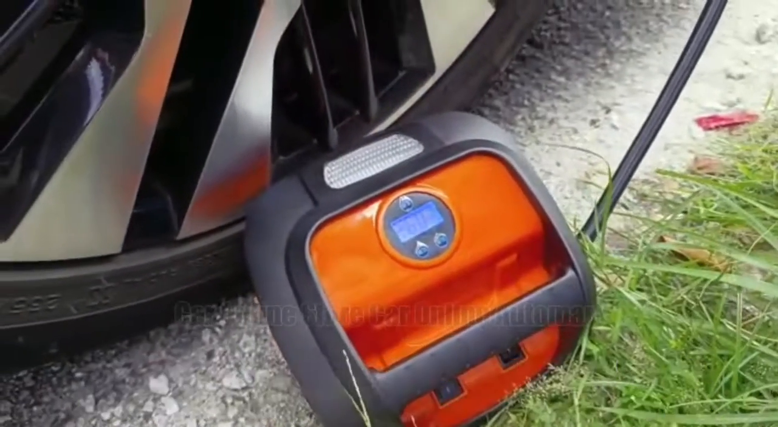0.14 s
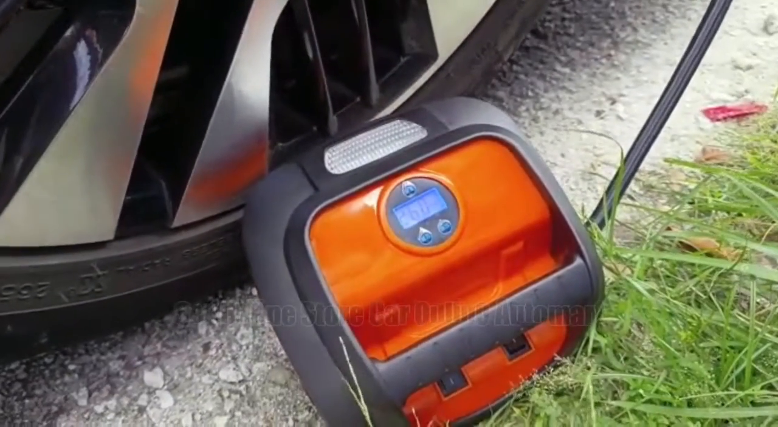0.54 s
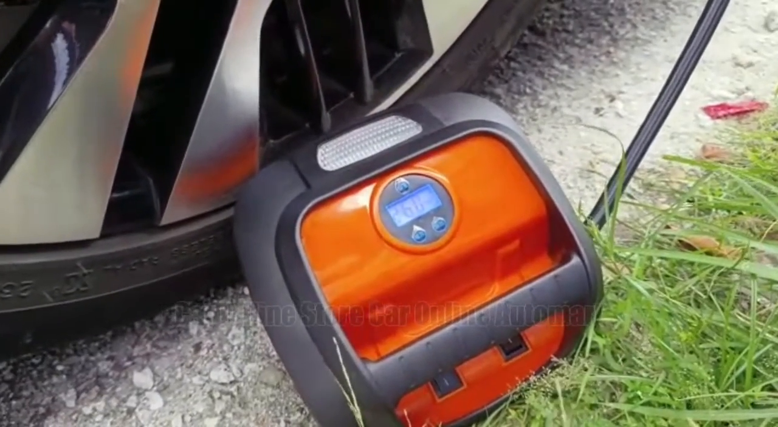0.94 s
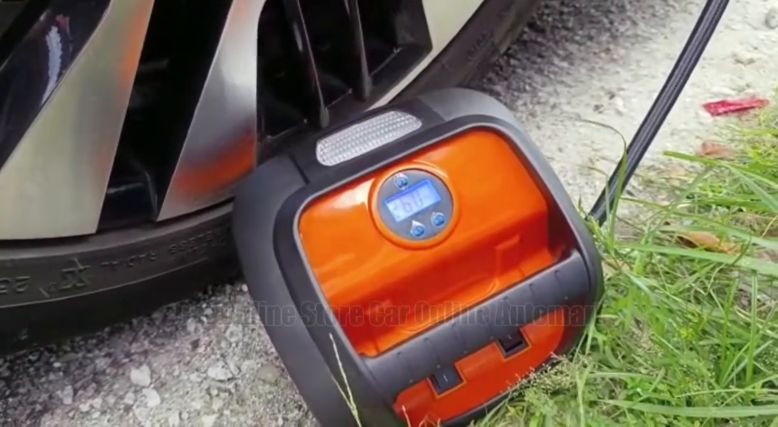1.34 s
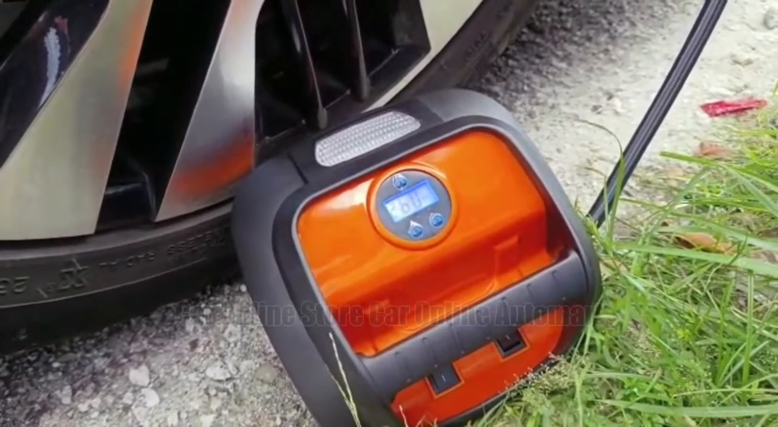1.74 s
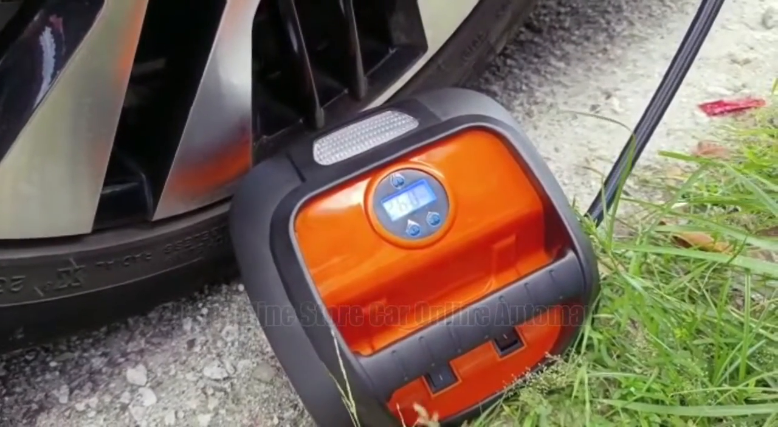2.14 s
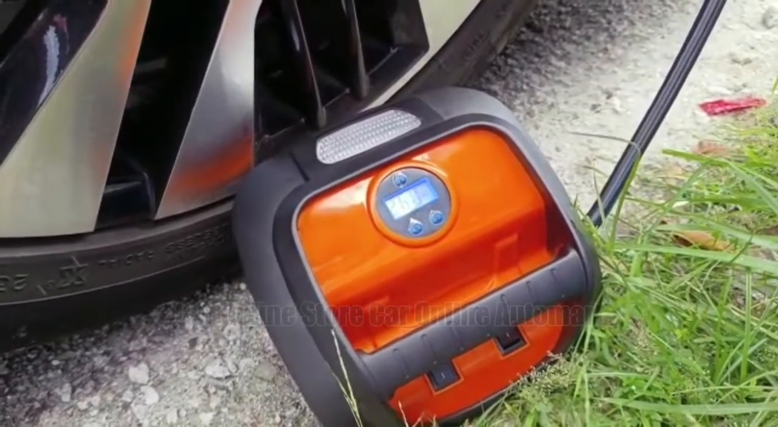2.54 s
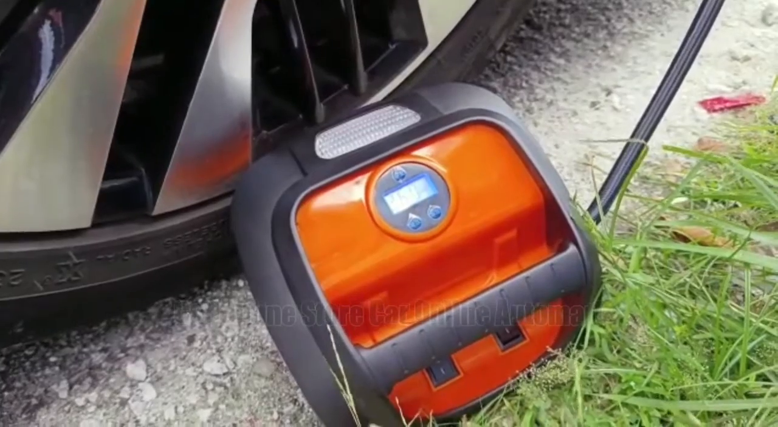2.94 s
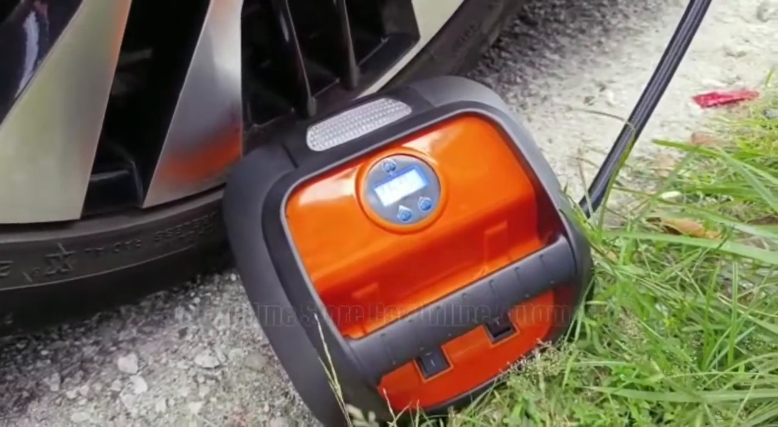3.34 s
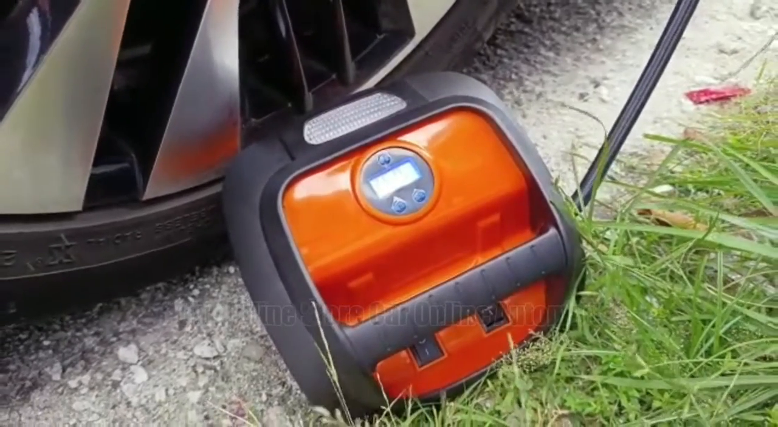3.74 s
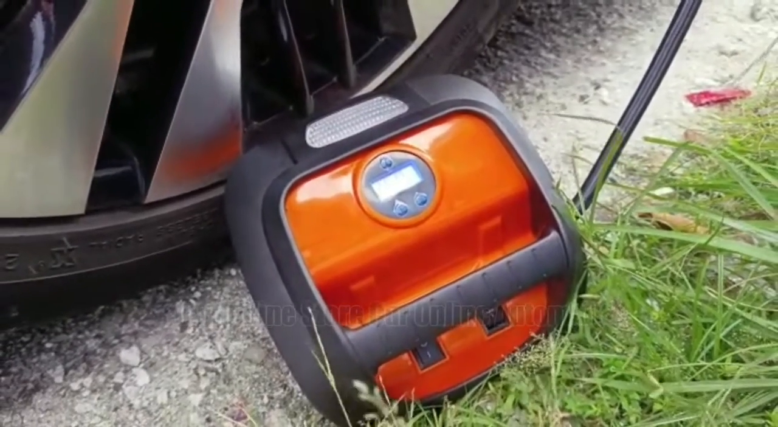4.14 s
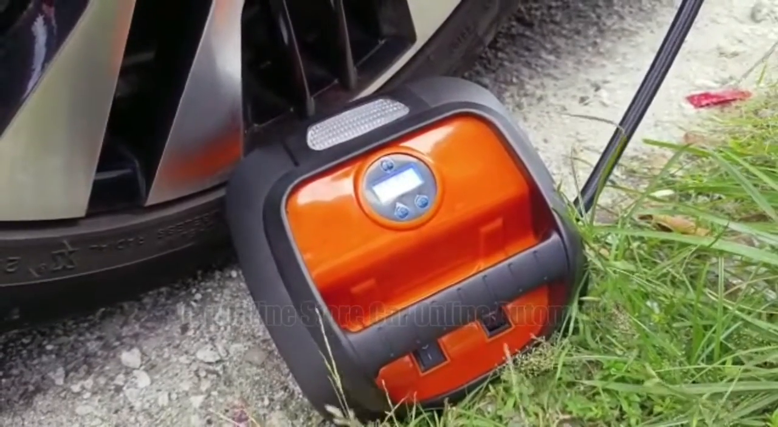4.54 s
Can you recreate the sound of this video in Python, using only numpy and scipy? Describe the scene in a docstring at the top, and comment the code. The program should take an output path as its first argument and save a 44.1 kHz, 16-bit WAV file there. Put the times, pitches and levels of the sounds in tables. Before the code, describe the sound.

A small portable air compressor is already running at the start, pumping up a car tyre outdoors, heard nearby in stereo. Its piston beats about forty times a second, so the knocks in the plastic case blend into a hard, even, rattling drone. A bright buzz from the fluttering valve, a steady motor whine and a light hiss of air ride on each stroke. Over the first 2 seconds the pump gets very slightly louder as it settles under load, while its speed and pitch barely change. From about 3.1 to 3.6 seconds a few mid-pitched tones swell and fade and the buzz softens a little. From about 3.8 seconds other tones rise gently and the hiss becomes slightly brighter. A faint low outdoor rumble lies underneath throughout. The pump is still running at the end, at about 4.7 seconds.

```python
"""A small piston air pump runs on gravel beside a car wheel, heard through a two-port microphone.
From the start its crank turns about 41 times a second. In each turn the rod and gears knock in the
plastic case, then the outlet valve flutters, air hisses and the valve snaps shut. The motor whines along.
Over the first two seconds the pump gets a little louder as it settles under load. After three seconds
a few tones swell and the treble shifts. A low outdoor rumble lies under it all, to the end."""
import sys
import numpy as np
from scipy import signal
from scipy.fft import rfft, irfft, next_fast_len
from scipy.io import wavfile
from scipy.ndimage import uniform_filter1d, map_coordinates

SR = 44100
rng = np.random.default_rng(int(sys.argv[2]) if len(sys.argv) > 2 else 0)


def to_wav(s):
    """Save 16-bit WAV."""
    ch = np.atleast_2d(s).T  # columns
    pcm = np.round(np.clip(ch, -1, 1) * 32767)  # PCM
    wavfile.write(sys.argv[1], SR, pcm.astype(np.int16))


N = 206724

# An "order" is a pitch counted in cycles per crank turn: order 10 is about 410 Hz.
# Levels in the tables are relative; the functions add their own gains.
# How fast the crank turns: time_s, turns_per_s
CRANK_SPEED = [(0, 41.07), (.68, 41.025), (.82, 40.88), (1.2, 40.9), (1.65, 40.768), (3.0, 40.751),
               (3.34, 40.953), (3.7, 40.729), (4.0, 40.852), (4.36, 40.618), (4.69, 40.752)]
# The blows in one turn and how hard they ring the case: angle_turns, low_db, middle_db, high_db
CASE_BLOWS = [(.143, 3.6, 2.7, -.5), (.228, -13.3, -4.4, -5.5), (.37, 2.7, -2, -7), (.475, -2.3, .4, -3.6),
              (.583, -9.2, 2.1, -5.2)]
# The low, middle and high ringing of the case: highest_order, delay_turns
CASE_RINGS = [(20, .037), (33, 0), (47, .028)]
# Tones of the knocking case, one row for each order from 2 to 47: left_db, right_db
KNOCK_TONES = [(-44, -45), (-49, -50), (-54, -55), (-59, -57), (-51, -51), (-52, -46), (-49, -50),
               (-54, -50), (-62, -58), (-58, -69), (-44, -45), (-48, -41), (-39, -36), (-45, -57),
               (-41, -42), (-55, -51), (-31, -35), (-34, -31), (-52, -53), (-46, -52), (-45, -50),
               (-42, -41), (-45, -41), (-35, -34), (-35, -30), (-36, -35), (-32, -34), (-40, -37),
               (-37, -41), (-49, -48), (-47, -42), (-48, -42), (-50, -48), (-57, -46), (-46, -43),
               (-52, -44), (-54, -46), (-47, -38), (-42, -35), (-49, -38), (-66, -52), (-55, -53),
               (-56, -56), (-45, -55), (-45, -45), (-54, -49)]
# Noise of the loose rattle: pitch_hz, left_db, right_db
RATTLE_NOISE = [(405, -86, -80), (477, -64.5, -69), (516, -68, -59), (604, -65.5, -77), (722, -53.5, -58),
                (777, -60, -52.5), (840, -68.5, -69), (930, -59, -58), (998, -50, -50), (1080, -70, -59),
                (1216, -57.5, -53), (1414, -62.5, -65), (1660, -73, -56), (1780, -71, -67),
                (1890, -63, -61)]
# Tones that sing out for a while: start_s, end_s, order, left_db, right_db
SWELLING_TONES = [(3.1, 3.6, 24, -33, -29), (-.6, .6, 24, -40, -35), (-1, 1.6, 23, -45, -41),
                  (-1, 1.7, 30, -40, -48), (3.15, 3.55, 32, -43, -37), (-.5, 1.2, 32, -48, -43),
                  (3.8, 5.2, 26, -40, -37), (3.9, 5.2, 25, -40, -38)]
# Tones of the fluttering valve, orders 48 to 69: left_db, right_db
FLUTTER_TONES = [(-53, -47), (-58, -40), (-48, -35), (-50, -42), (-51, -39), (-37, -35), (-43, -38),
                 (-45, -34), (-54, -38), (-42, -31), (-43, -38), (-48, -37), (-43, -41), (-44, -50),
                 (-43, -49), (-42, -48), (-52, -43), (-43, -43), (-50, -42), (-48, -45), (-46, -50),
                 (-53, -63)]
# Tones of the valve's reed (a thin flap) slapping its seat, orders 70 to 117: left_db, right_db
BUZZ_TONES = [(-46, -53), (-56, -56), (-49, -53), (-52, -50), (-54, -54), (-56, -49), (-49, -50),
              (-45, -46), (-52, -49), (-47, -52), (-51, -55), (-55, -58), (-56, -63), (-52, -65),
              (-58, -57), (-54, -56), (-55, -55), (-55, -50), (-60, -56), (-66, -61), (-67, -62),
              (-69, -66), (-69, -62), (-67, -67), (-67, -69), (-65, -65), (-61, -57), (-54, -51),
              (-55, -50), (-54, -50), (-58, -57), (-64, -62), (-59, -58), (-56, -52), (-58, -52),
              (-62, -51), (-58, -46), (-61, -54), (-58, -51), (-56, -48), (-57, -49), (-55, -47),
              (-54, -42), (-56, -44), (-61, -49), (-58, -56), (-59, -58), (-61, -61)]
# Noise of air rushing through the valve: pitch_hz, left_db, right_db
RUSH_NOISE = [(1890, -62, -60.5), (2230, -62, -54.5), (2390, -63, -51.5), (2420, -56, -63),
              (2670, -61.5, -61), (3210, -66.5, -60.5), (3400, -62, -71), (3750, -75, -70.5),
              (3870, -68, -71), (4420, -74, -71), (4570, -76, -59.5), (4764, -88, -77.5)]
# Whine of the commutator (the motor's turning contacts), orders 10.45 to 25.45: left_db, right_db
WHINE_TONES = [(-62, -64), (-66, -67), (-42, -40), (-38, -33), (-38, -39), (-45, -42), (-32, -33),
               (-36, -38), (-38, -38), (-51, -47), (-65, -60), (-56, -65), (-56, -60), (-47, -45),
               (-55, -52), (-51, -48)]
# Motor shaft tones that beat against the crank's tones: order, left_db, right_db
SHAFT_TONES = [(12.82, -50, -50), (13.82, -54, -54), (16.15, -47, -47), (16.82, -47, -47),
               (17.85, -44, -42), (18.3, -47, -45), (18.83, -44, -42), (19.83, -51, -51)]
# Noise of hissing air: pitch_hz, left_db, right_db
HISS_NOISE = [(4730, -69.5, -75), (5500, -70.5, -73), (6420, -70, -67.5), (6780, -77, -72),
              (7220, -68.5, -63.5), (7980, -67.5, -73), (8360, -69, -63), (8850, -71, -67.5),
              (10000, -71, -71.5), (11100, -70, -74.5), (11800, -64.5, -72.5), (12500, -68, -77),
              (13300, -73.5, -74.5), (15500, -72, -86)]
# How the treble rises and falls: time_s, buzz_db, hiss_db
TREBLE_LEVELS = [(0, 0, 0), (.4, -.4, -.2), (.7, .7, .7), (1.8, 1.1, -.3), (3.0, 0, -.4), (3.55, -2.2, -1),
                 (3.9, -1, .8), (4.3, -1, 1.1), (4.6, -1.2, 2.3)]
# Bands of the pump's sound that swell or sink for a while: start_s, end_s, low_hz, high_hz, gain_db
BAND_SHIFTS = [(-1, 1.5, 1005, 1040, -3), (.5, 2.2, 960, 1000, -3.5), (3.6, 6, 1085, 1120, -4),
               (-1, 1.0, 760, 800, -1), (3.55, 4.0, 550, 590, .6), (3.14, 6, 3400, 3750, 1.5),
               (-1, .8, 4400, 4750, 1), (3.55, 4.1, 700, 800, .6), (-1, .9, 1040, 1090, 1.6),
               (-1, 1.2, 1125, 1205, -3.6), (3.12, 3.56, 1010, 1250, -3), (-1, 1.1, 1250, 1500, 2),
               (3.6, 6, 1250, 1600, -4), (1.5, 3.1, 1600, 1800, 2.5), (-1, 1.0, 2220, 2350, -2.3),
               (-1, .6, 2360, 2600, 2.5), (1.1, 3.1, 2600, 2800, 2.5), (3.12, 3.7, 2480, 2800, -2),
               (-1, 1.1, 3000, 3300, 3), (3.55, 3.98, 3500, 3600, 8), (3.14, 3.54, 3450, 3950, 3),
               (1.2, 3.1, 1260, 1400, -2), (1.45, 3.5, 3900, 4080, 2.5), (3.5, 3.95, 3900, 4100, -2.5),
               (1.1, 2.6, 4100, 4350, 2.2), (3.15, 6, 4480, 4750, -1.2), (3.5, 6, 4100, 4480, 1.5),
               (3.5, 6, 5200, 6500, -2.2), (3.6, 6, 7000, 9000, 1.6), (4.0, 6, 9500, 13500, -1.5),
               (3.8, 6, 2260, 2600, -.6), (.4, 1.6, 3300, 3650, -2)]
# Noise of the outdoor rumble: pitch_hz, left_db, right_db
RUMBLE_NOISE = [(25, -76, -75), (40.2, -66, -65), (62, -53, -55), (84.6, -57, -57.5), (121, -59, -54),
                (159, -61, -63), (197, -65.5, -66.5), (253, -61, -60), (288, -68, -66), (367, -80.5, -70.5),
                (435, -74.5, -64)]
# How the rumble rises and falls: time_s, level_db
RUMBLE_LEVELS = [(0, -.5), (.45, -1), (.85, 1.1), (1.2, 0), (1.8, 1.4), (2.6, .2), (3.1, -1.5), (3.4, -.3),
                 (3.95, -1.8), (4.4, 1.5)]
# How the microphone's two openings compare: pitch_hz, right_lag_radians, likeness_0_to_1
MIC_PORTS = [(40, 0, .97), (130, .1, .96), (300, .55, .9), (780, 1.0, .92), (1000, 2.1, .87),
             (1400, 1.5, .5), (1700, 2.4, .75), (2150, 1.8, .6), (2500, 0, .7), (3200, 2.5, .3),
             (4000, 0, .6), (5000, 0, .3), (6600, 3, .5), (9000, 2, .25), (11000, 0, .3), (15000, 0, .1)]

START_ANGLE_TURNS, MEAN_CRANK_HZ = .487, np.mean(CRANK_SPEED, axis=0)[1]
COMMUTATOR_SEGMENTS, MOTOR_TURNS_PER_CRANK_TURN = 3, 5.15
SETTLE_S, CASE_START_DB, FLUTTER_START_DB = 1.2, -.8, -.9
WANDER_S, WANDER_HZ = .000042, 4.0  # size and pace of the crank's timing drift
SHIFT_FADE_S, SHIFT_EDGE_HZ = .05, 15
TREBLE_LIMIT_HZ = 15680


def case_knocks():
    """Rod and gears strike the case alike every turn, making a hum; a looser rattle dies away after."""
    orders = np.arange(len(KNOCK_TONES)) + 2
    low_rattle = noise(RATTLE_NOISE[:11], burst(.06, .09, .45, rest_db=-5), uneven_db=.3)
    high_rattle = noise(RATTLE_NOISE[10:], burst(.08, .11, .42, rest_db=-9), uneven_db=.6)
    hum = crank_tones(orders, KNOCK_TONES, blow_phases(orders), waver=.21, waver_turns=1.6)
    return (amp(.1) * hum + low_rattle + high_rattle) * settling(CASE_START_DB)


def blow_phases(orders):
    """Phases that line the tones up so that they add into the blows of one turn."""
    angle, *strength_db = np.transpose(CASE_BLOWS)
    highest_order, delay = np.transpose(CASE_RINGS)
    group = np.searchsorted(highest_order, orders)
    arrival = angle + delay[group][:, None]
    blows = np.exp(-2j * np.pi * orders[:, None] * arrival) * amp(strength_db)[group]
    return np.angle(blows.sum(axis=1))


def case_swells():
    """Single tones of the case's hum fade in and out."""
    t, turns, out = np.arange(N) / SR, crank_turns(), np.zeros((2, N))
    for start, end, order, *level_db in SWELLING_TONES:
        order = np.round([order])
        lag = at_pitch(MIC_PORTS, order * MEAN_CRANK_HZ)[0, 0]
        fade = np.sin(np.pi * np.clip((t - start) / (end - start), 0, 1))
        angle = 2 * np.pi * order * turns + blow_phases(order) - np.array([[0], [lag]])
        out += np.sqrt(2) * amp(level_db)[:, None] * fade * np.cos(angle)
    return out


def valve_flutter():
    """The reed flutters while air is pushed out, then rings on once it has shut."""
    offset = np.arange(len(FLUTTER_TONES)) - 9  # steps away from order 57
    after_shut = offset > 5
    scatter = rng.standard_normal(len(offset)) * np.where(offset > 3, 1.2, .25)
    arrival_turns = np.where(after_shut, .12, .932)
    phases = -2 * np.pi * offset * arrival_turns + .045 * offset ** 2 + scatter
    flutter = crank_tones(offset + 57, FLUTTER_TONES, phases, waver=.29, waver_turns=1.6)
    return amp(2.2) * flutter * settling(FLUTTER_START_DB)


def valve_buzz():
    """The reed slaps its seat, making a bright buzz."""
    offset = np.arange(len(BUZZ_TONES)) - 42  # steps away from order 112
    after_shut = offset < -9
    scatter = rng.standard_normal(len(offset)) * np.where(after_shut, 1.05, .3)
    arrival_turns = np.where(after_shut, .09, .93)
    phases = -2 * np.pi * offset * arrival_turns + .1 * offset ** 2 * ~after_shut + scatter
    levels_db = BUZZ_TONES + np.where(after_shut, .5, 2.6)[:, None]
    buzz = crank_tones(offset + 112, levels_db, phases, waver=.45, waver_turns=1.0)
    return buzz * amp(over_time(TREBLE_LEVELS, 1))


def valve_rush():
    """Air rushes through the valve on each stroke."""
    # the lowest band also carries a softer noisy knock from the case, just after the valve shuts
    rush_and_knock = burst(.84, .1, .06, rest_db=-3) + amp(-4.3) * burst(.16, .07, .3, rest_db=-30)
    low = noise(RUSH_NOISE[:5], unit_level(rush_and_knock), uneven_db=.7)
    middle = noise(RUSH_NOISE[4:9], burst(.88, .15, .4, rest_db=-5), uneven_db=1.1)
    high = noise(RUSH_NOISE[8:], burst(.86, .13, .3, rest_db=-7), uneven_db=1.4)
    return amp(-1.3) * (low + middle + high) * settling(FLUTTER_START_DB)


def valve_snap():
    """The valve snaps shut: high tones line up into the part of its tick that repeats every turn."""
    orders = np.arange(118, 240)
    levels_db = at_pitch(HISS_NOISE, orders * MEAN_CRANK_HZ).T + 7
    shut_turns = .04
    phases = -2 * np.pi * orders * shut_turns + 1.1 * rng.standard_normal(len(orders))
    snap = crank_tones(orders, levels_db, phases, waver=.4, waver_turns=1.5)
    return snap * amp(over_time(TREBLE_LEVELS, 2))


def motor_whine():
    """The commutator whines; the load swings each turn and spreads the tone. The shaft adds its own."""
    offset = np.arange(len(WHINE_TONES)) - 5  # steps away from the commutator's own order
    turn = np.arange(64) / 64
    load = 1 + .67 * np.cos(2 * np.pi * (turn - .255))
    phase_bend = 1.9 * np.sin(2 * np.pi * (turn - .811)) + .34 * np.sin(4 * np.pi * (turn - .27))
    phases = np.angle(np.fft.fft(load * np.exp(1j * phase_bend))[offset])
    orders = offset + COMMUTATOR_SEGMENTS * MOTOR_TURNS_PER_CRANK_TURN
    whine = crank_tones(orders, WHINE_TONES, phases, waver=.15, waver_turns=3)
    shaft_orders, *shaft_db = np.transpose(SHAFT_TONES)
    shaft_phases = 2 * np.pi * rng.random(len(shaft_orders))
    shaft = crank_tones(shaft_orders, np.transpose(shaft_db), shaft_phases, waver=.6, waver_turns=4.0)
    return (whine + amp(-3.5) * shaft) * settling(CASE_START_DB)


def air_hiss():
    """A flickering hiss swells as air is pushed out, with noisy ticks as the valve opens and shuts."""
    hiss = noise(HISS_NOISE, burst(.68, .38, .35, rest_db=1.5), uneven_db=.4)
    tick = noise(HISS_NOISE, burst(.037, .045, .03, rest_db=-36), uneven_db=1.2) * amp([[-15], [-11]])
    chatter = noise(HISS_NOISE[3:9], burst(.04, .03, .07, rest_db=-30), uneven_db=1.6) * amp(-9)
    opening = noise(HISS_NOISE[8:], burst(.84, .05, .09, rest_db=-30), uneven_db=1.6) * amp(-9)
    slow_noise = uniform_filter1d(uniform_filter1d(rng.standard_normal(N), size=3500), size=3500)
    flicker_db = .5 * unit_level(slow_noise)
    return (hiss + tick + chatter + opening) * amp(over_time(TREBLE_LEVELS, 2) - .5 + flicker_db)


def crank_turns():
    """How far the crank has come at each sample, in turns."""
    return START_ANGLE_TURNS + np.cumsum(over_time(CRANK_SPEED, 1)) / SR


def crank_tones(orders, levels_db, phases, waver, waver_turns):
    """Tones that follow the crank; each wavers in size and phase, since no two turns are alike."""
    turn_count, steps_per_turn = 200, 1440
    steps = turn_count * steps_per_turn
    nearby = np.arange(-90, 91)  # spectrum slots around a tone; filling them makes it waver
    bell = np.exp(-2 * (np.pi * nearby * waver_turns / turn_count) ** 2)
    lags = at_pitch(MIC_PORTS, orders * MEAN_CRANK_HZ)[0]
    spectrum = np.zeros((2, steps // 2 + 1), complex)
    for order, level_db, phase, lag in zip(orders, levels_db, phases, lags):
        real, imaginary = rng.standard_normal((len(nearby), 2)).T
        spread = (real + 1j * imaginary) * bell / np.linalg.norm(bell) / np.sqrt(2)
        tone = (nearby == 0) + waver * spread
        left_right = amp(level_db) * np.exp(1j * (phase - np.array([0, lag])))
        spectrum[:, round(order * turn_count) + nearby] += left_right[:, None] * tone
    wave_by_angle = irfft(spectrum) * steps / np.sqrt(2)
    position = crank_turns() * steps_per_turn
    return np.array([np.interp(position, np.arange(steps), side) for side in wave_by_angle])


def burst(start_turns, rise_turns, fall_turns, rest_db):
    """A loudness shape that rises at the same point of every turn, then dies toward a resting level."""
    since = (crank_turns() - start_turns) % 1
    rise = np.minimum(since / rise_turns, 1)
    fall = np.exp(-np.maximum(since - rise_turns, 0) / fall_turns)
    return unit_level(rise * fall + amp(rest_db))


def noise(spectrum, loudness, uneven_db=0):
    """Stereo noise coloured by a table; uneven_db gives each piston stroke its own strength."""
    turns, size = crank_turns(), next_fast_len(N)
    strengths = amp(uneven_db * rng.standard_normal(int(turns[-1]) + 2))
    stroke = strengths[(turns + .25).astype(int)]
    left, unrelated = rfft(rng.standard_normal((2, N)) * loudness * stroke, size)
    hz = np.fft.rfftfreq(size, 1 / SR)
    lag, likeness = at_pitch(MIC_PORTS, hz)
    right = likeness * left * np.exp(-1j * lag) + np.sqrt(1 - likeness ** 2) * unrelated
    in_band = (hz >= spectrum[0][0]) & (hz <= spectrum[-1][0])
    colour = amp(at_pitch(spectrum, hz)) * in_band * np.sqrt(SR / 2)
    return irfft(np.array([left, right]) * colour, size)[:, :N]


def settling(start_db):
    """The pump gets louder as it settles under load; start_db compares its start with its final level."""
    db = start_db * np.exp(-(np.arange(N) / SR / SETTLE_S) ** 2)
    return amp(db - db.mean())


def wander_timing(sound):
    """The crank runs a little early or late from turn to turn, and the sound moves with it."""
    smoothing = np.exp(-2 * np.pi * WANDER_HZ / SR)
    drift = signal.lfilter([1], [1, -smoothing], uniform_filter1d(rng.standard_normal(N), size=1000))
    position = np.arange(N) + WANDER_S * SR * unit_level(drift)
    return np.array([map_coordinates(side, [position], order=3, mode="nearest") for side in sound])


def shift_bands(sound):
    """Bands of pitch get louder or softer for a while, with gentle edges."""
    hz, t, spectra = signal.stft(sound, SR, nperseg=2048, noverlap=1536)
    gain_db = np.zeros(spectra.shape[1:])
    for start, end, low_hz, high_hz, db in BAND_SHIFTS:
        when = (np.tanh((t - start) / SHIFT_FADE_S) - np.tanh((t - end) / SHIFT_FADE_S)) / 2
        band = (np.tanh((hz - low_hz) / SHIFT_EDGE_HZ) - np.tanh((hz - high_hz) / SHIFT_EDGE_HZ)) / 2
        gain_db += db * np.outer(band, when)
    return signal.istft(spectra * amp(gain_db), SR, nperseg=2048, noverlap=1536)[1][:, :N]


def outdoor_rumble():
    """Low background noise that slowly rises and falls."""
    return noise(RUMBLE_NOISE, loudness=1) * amp(over_time(RUMBLE_LEVELS, 1))


def amp(db):
    """Turns decibels into a number to multiply by."""
    return 10 ** (np.asarray(db) / 20)


def unit_level(x):
    """Scales x so that its average power is 1."""
    return x / np.sqrt(np.mean(x ** 2) + 1e-20)


def at_pitch(table, hz):
    """Looks up a table's columns at the pitches hz, sliding between rows on a log scale."""
    pitches, *columns = np.transpose(table)
    return np.array([np.interp(np.log(hz + 1), np.log(pitches + 1), column) for column in columns])


def over_time(table, column):
    """One column of a time table, joined by straight lines to give a value for every sample."""
    columns = np.transpose(table)
    return np.interp(np.arange(N) / SR, columns[0], columns[column])


def scene():
    """The pump's case, valve, motor and hiss, over the outdoor rumble."""
    case = case_knocks() + case_swells()
    valve = valve_flutter() + valve_buzz() + valve_rush() + valve_snap()
    pump = wander_timing(case + valve + motor_whine()) + air_hiss()
    return shift_bands(pump) + outdoor_rumble()


def record(dry):
    """The recorder cuts off the very highest treble."""
    low_pass = signal.firwin(511, TREBLE_LIMIT_HZ, window=("kaiser", 9), fs=SR)
    return signal.oaconvolve(dry, low_pass[None], "same")


dry = scene()
out = record(dry)
to_wav(out)
```